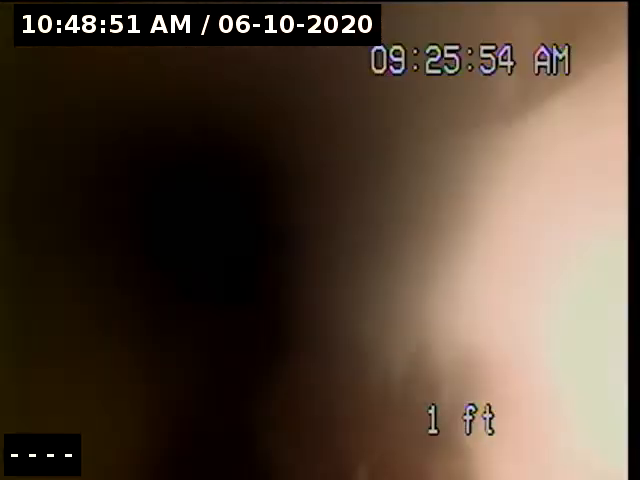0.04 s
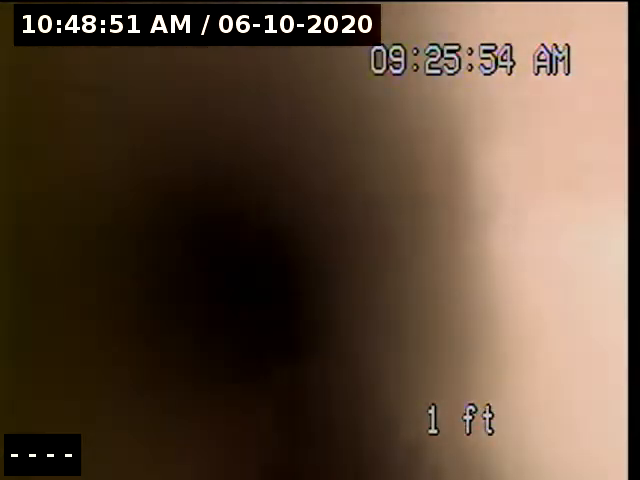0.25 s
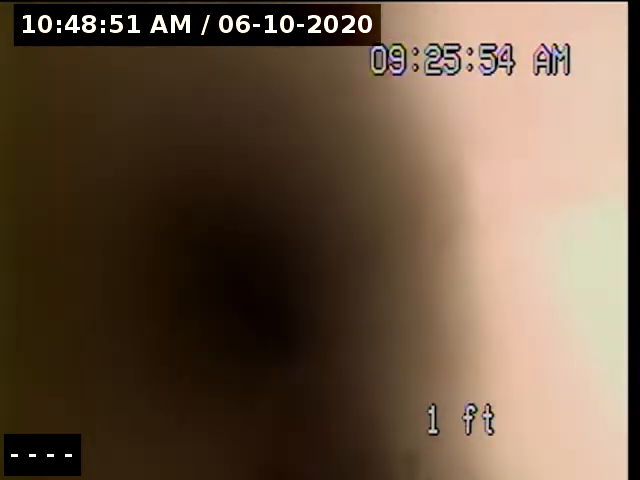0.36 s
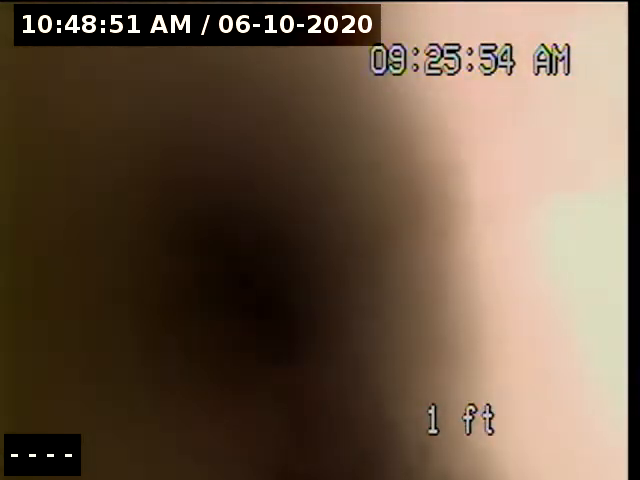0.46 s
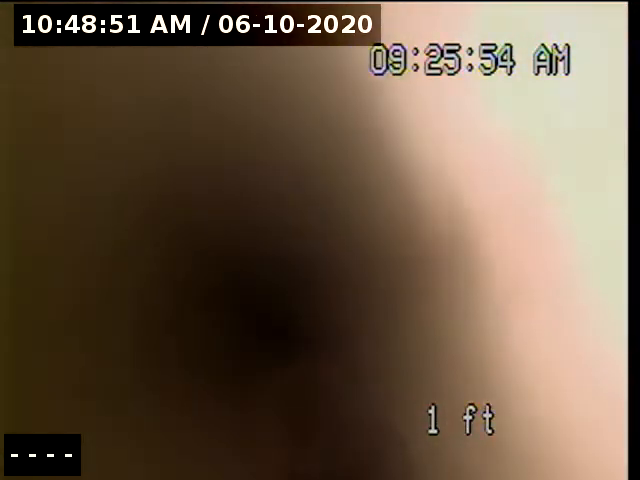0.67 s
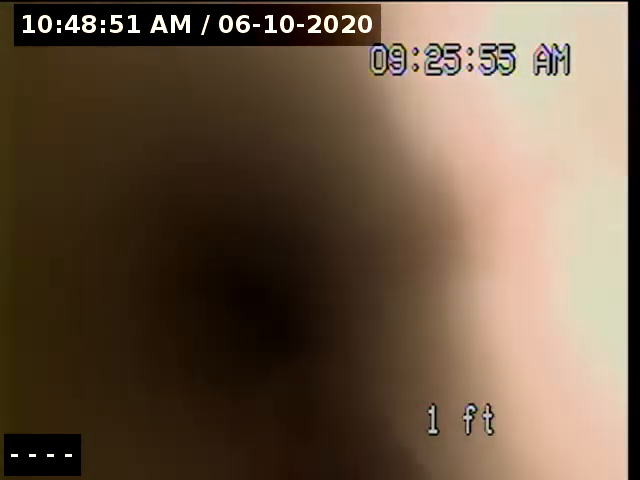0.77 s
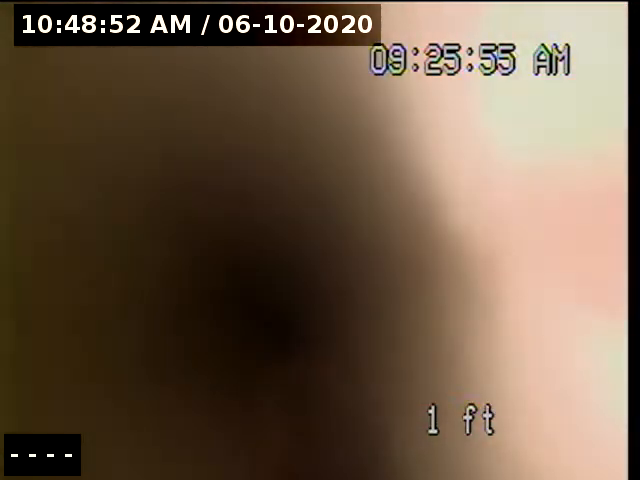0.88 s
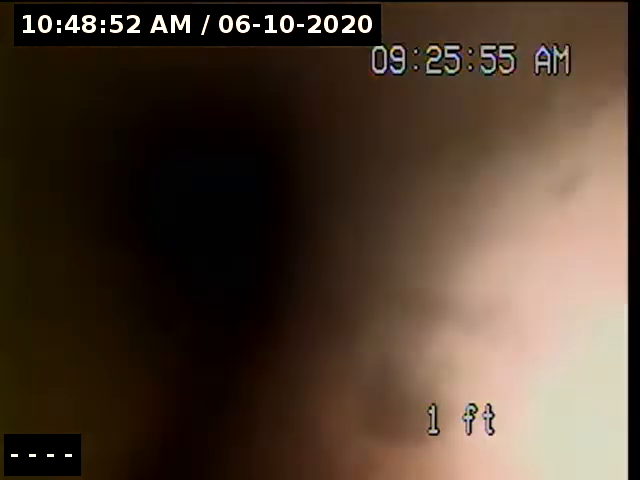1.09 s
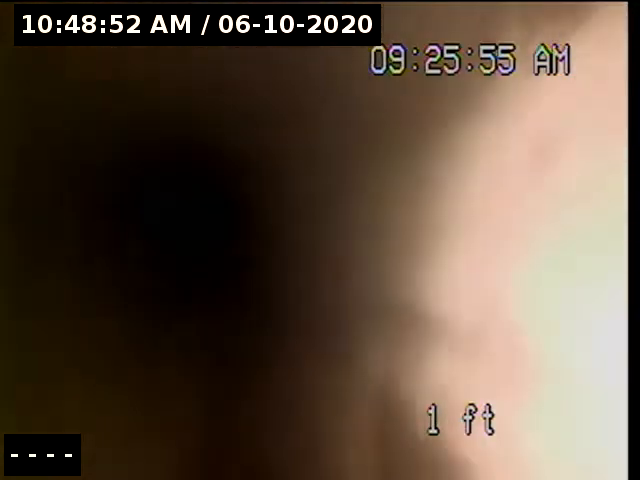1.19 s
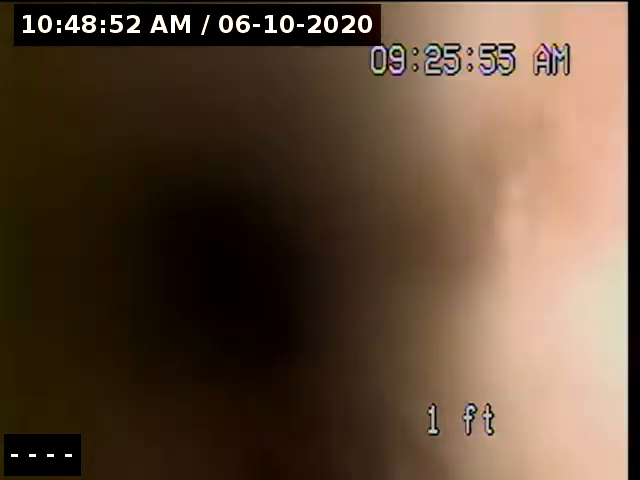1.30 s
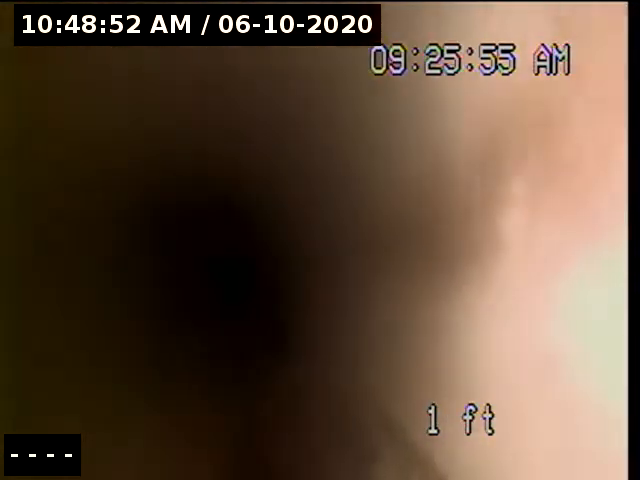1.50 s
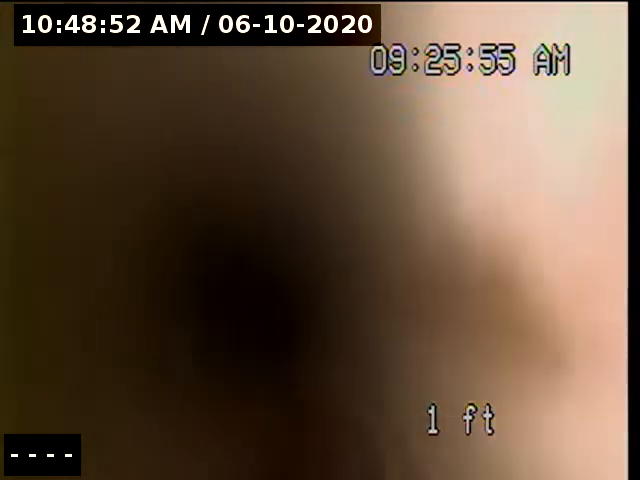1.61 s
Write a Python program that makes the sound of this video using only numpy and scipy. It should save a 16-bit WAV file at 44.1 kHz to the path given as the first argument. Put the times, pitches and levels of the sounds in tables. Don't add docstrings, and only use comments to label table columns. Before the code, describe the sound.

Close handling clatter: gritty rubbing, a heavy clank, a burst of crunching knocks, then a medium bump and small taps fading into steady muffled hiss, all through a distorting low-quality microphone inside the hollow case.

```python
import sys
import numpy as np
from scipy import signal
from scipy.io import wavfile
from scipy.ndimage import uniform_filter1d

SR = 44100
rng = np.random.default_rng(int(sys.argv[2]) if len(sys.argv) > 2 else 0)


def volts(x):
    e = np.asarray(x, float) / 20
    return 10 ** e


def generate_wav(signal):
    frames = np.transpose(np.atleast_2d(signal))
    scaled = np.clip(frames, -1, 1) * 32767
    pcm = np.round(scaled).astype(np.int16)
    wavfile.write(sys.argv[1], SR, pcm)


N = 72765

# [f/Hz, width/Hz, level/dB]
HISS_BANDS = [(129, 94, -13.5), (215, 62, -5), (444.4, 210, -6), (824, 414, 0), (1166, 340, -8),
              (1403, 73, -4.5), (1850, 1400, -11), (2606, 1200, -19), (6100, 3000, -34)]
# [start t/s, end t/s, f/Hz, level/dB]
WHINES = [
    (-.1, .2, 6078, -67),
    (1.03, 1.52, 7149, -63),
    (1.04, 1.14, 7989, -68),
    (1.22, 1.44, 7989, -66),
    (1.2, 1.45, 7520, -70),
    (1.2, 1.7, 6078, -70),
]
# [t/s, level/dB, f/Hz, t60/s]
WALL_NOTES = [
    (.2, 14.5, 646.6, 0.062),
    (.263, -2.5, 658, 0.025),
    (.345, -1.5, 900, 0.016),
    (.394, -9.5, 930, 0.037),
    (.406, -10, 1140, 0.035),
    (0.415, -11.5, 1480, 0.036),
    (0.77, -16, 411.5, 0.14),
    (0.905, 0, 1027, 0.098),
    (0.975, -7, 1236, 0.045),
    (1.213, -8, 608, 0.039),
]
# [t/s, level/dB, f/Hz, hold/s]
BOOMS = [(0.206, 16, 220.8, .012), (0.319, -11, 222, 0.0039), (0.339, -12, 218, .005),
         (.42, 7.5, 217, 0.055), (.478, 3.5, 217.8, 0.0071), (0.821, -18, 225.7, 0.041),
         (0.885, -7.5, 215, 0.015), (.912, 6, 219.7, 0.012), (0.943, -14, 238, 0.012),
         (1.07, -23.5, 243, 0.017), (1.132, -8, 226, 0.0042), (1.214, -4, 228.4, 0.0023),
         (1.285, -18.5, 296, 0.0086), (1.298, -14.5, 215, 0.013), (1.37, -16.5, 236, 0.0067)]
# [t/s, level/dB, rattle t60/s, brightness/dB]
KNOCKS = [(0.199, 15.5, 0.057, -4.5), (0.253, -9.5, 0.014, -14), (0.214, 7, 0.037, -9),
          (0.342, -8, 0.034, -15), (.351, -17, 0.029, -13.5), (.377, -11.5, 0.14, -10),
          (.394, -2.5, 0.01, -16), (0.405, -7.5, 0.038, -24.5), (0.417, 16.5, 0.013, -7),
          (0.43, 7, .015, -0.5), (0.439, 19.5, 0.0081, -7), (0.449, 9.5, 0.013, -3.5), (0.459, 7, .02, -8),
          (0.466, 11.5, 0.025, -16.5), (0.476, 4.5, 0.027, -5.5), (0.509, -15, .03, -12),
          (0.763, -15, 0.04, -5), (.776, -14.5, 0.13, -14), (0.795, -15, 0.02, -3),
          (0.854, -12, 0.052, -2.5), (0.872, -15.5, 0.051, -4), (.887, -14.5, 0.0067, -11.5),
          (0.907, 10.5, 0.027, -12), (0.974, -8, 0.02, -9.5), (1.066, -17, 0.15, -32),
          (1.130, -12.5, 0.015, -9.5), (1.14, -15.5, 0.13, -14), (1.213, -11.5, 0.071, -7),
          (1.29, -21.5, 0.24, -11), (1.392, -29, 0.066, -8)]
# [t/s, level/dB]
DRAG = [(0, -27.5), (.195, -63), (.22, -24.5), (.3, -21), (.4, -25.5), (.48, -20), (.55, -26), (.7, -34),
        (.76, -37), (.82, -35), (.92, -19.5), (1.0, -31), (1.07, -28.5), (1.12, -31.5), (1.16, -29.5),
        (1.2, -38), (1.25, -26), (1.4, -40.5)]
# [f/Hz, width/Hz, level/dB]
CASE_MODES = [(39, 44, -10), (215, 49, -3.5), (370.4, 108, -4.5), (651.4, 149, -2), (900, 463, -3),
              (1140, 308, 0), (1445, 298, -2.5), (1721, 246, -3.5)]
# [f/Hz, width/Hz, level/dB]
SHELL_MODES = [(1683, 140, 9), (2037, 307, 8.5), (2390, 270, 4), (2761, 460, 5.5), (3286, 560, 4.5),
               (4760, 3600, 1), (6390, 1100, -4), (7800, 4500, -2.5)]

HISS_DB, HISS_FLICKER_DB = -24.5, 0.7
BOOM_ATTACK_S, BOOM_T60_S = 0.005, 0.07
KNOCK_DB, KNOCK_HOLD_S, KNOCK_GRIT_DB = -0.5, 0.0044, 4
DRAG_WANDER_DB, DRAG_GRIT_DB, DRAG_BRIGHT_DB = 3.0, 1, -2.5
LEAN, RAIL_UP, RAIL_DOWN = 1, 1.294, 0.33
SAG, SAG_S = 1.35, 0.0017
COUPLING_HZ, NOTCH_HZ, ROLL_HZ, TOP_HZ = 68, 4005, 3240, 7770
CONVERTER_TOP, FULL_SCALE = 0.69, 0.71


def set_level(x, db):
    return x * volts(db) / np.sqrt(np.mean(x ** 2))


def ring(x, modes):
    out = 0
    for k, (hz, width, db) in enumerate(modes):
        b, a = signal.iirpeak(hz, hz / width, fs=SR)
        once = signal.lfilter(b, a, x)
        twice = signal.lfilter(b, a, once)
        out = out + (-1) ** k * volts(db) * twice / np.sqrt(width)
    return out


def grit(spread_db):
    clicks = rng.standard_normal(N)
    return set_level(clicks * volts(spread_db * rng.exponential(size=N)), 0)


def wander(rate_hz):
    hold = int(SR / rate_hz)
    steps = np.repeat(rng.standard_normal(N // hold + 1), hold)
    slow = uniform_filter1d(uniform_filter1d(steps, hold), hold)[:N]
    return slow / slow.std()


def outdoor_hiss():
    total = 0
    for band in HISS_BANDS:
        noise = ring(rng.standard_normal(N), [band])
        total = total + noise * volts(HISS_FLICKER_DB * wander(11.35))
    return set_level(total, HISS_DB)


def high_whines(t):
    on, off, hz, db = np.array(WHINES).T[:, :, None]
    fade = np.clip(np.minimum(t - on, off - t) / 0.03, 0, 1)
    waver_db = 1.6 * np.array([wander(45) for _ in WHINES])
    phase = 2 * np.pi * hz * t + 1.5 * wander(30)
    return (fade * volts(db + waver_db) * np.sin(phase)).sum(0)


def wall_clanks(t):
    on, db, hz, t60 = np.array(WALL_NOTES).T[:, :, None]
    age = np.maximum(t - on, 0)
    return (volts(db - 60 * age / t60) * np.sin(2 * np.pi * hz * age)).sum(0)


def case_booms(t):
    on, db, hz, hold = np.array(BOOMS).T[:, :, None]
    age = t - on
    swell = np.clip(age / BOOM_ATTACK_S, 0, 1)
    decay_db = 60 * np.maximum(age - hold, 0) / BOOM_T60_S
    return (swell * volts(db - decay_db) * np.sin(2 * np.pi * hz * age)).sum(0)


def case_rattle(t):
    on, db, t60, bright = np.array(KNOCKS).T[:, :, None]
    decay_db = 60 * np.maximum(t - on - KNOCK_HOLD_S, 0) / np.maximum(t60, 0.005)
    knocks = (t >= on) * volts(KNOCK_DB + db - decay_db)
    drag = volts(np.interp(t, *np.array(DRAG).T) + DRAG_WANDER_DB * wander(40))
    blow, rub = grit(KNOCK_GRIT_DB), grit(DRAG_GRIT_DB)
    body_push = blow * knocks.sum(0) + rub * drag
    shell_push = blow * (knocks * volts(bright)).sum(0) + rub * drag * volts(DRAG_BRIGHT_DB)
    body = ring(body_push, CASE_MODES) / np.std(ring(rub, CASE_MODES))
    shell = ring(shell_push, SHELL_MODES) / np.std(ring(rub, SHELL_MODES))
    return body + shell


def scene():
    t = np.arange(N) / SR
    return (case_rattle(t) + case_booms(t) + wall_clanks(t) + outdoor_hiss())[None]


def input_overload(x):
    bent = np.where(x > 0, x * (1 + LEAN * x), x / (1 + LEAN * np.abs(x)))
    memory = np.exp(-1 / (SAG_S * SR))
    hits = 1.0 * (bent > RAIL_UP)
    rail = RAIL_UP - SAG * signal.lfilter([1 - memory], [1, -memory], hits)
    return np.clip(bent, -RAIL_DOWN, rail)


def output_filter(x):
    zeros = np.array([1, -2 * np.cos(2 * np.pi * NOTCH_HZ / SR), 1])
    poles = signal.butter(2, ROLL_HZ, fs=SR)[1]
    x = signal.lfilter(zeros * poles.sum() / zeros.sum(), poles, x)
    x = signal.sosfilt(signal.cheby2(8, 45, TOP_HZ + 1500, fs=SR, output="sos"), x)
    return signal.sosfilt(signal.butter(4, TOP_HZ, fs=SR, output="sos"), x)


def low_pass(x):
    return signal.sosfilt(signal.butter(12, 8800, fs=SR, output="sos"), x)


def record(dry):
    x = input_overload(dry)
    x = signal.sosfilt(signal.butter(1, COUPLING_HZ, "high", fs=SR, output="sos"), x)
    x = np.minimum(x, CONVERTER_TOP)
    x = output_filter(x) + high_whines(np.arange(N) / SR)
    mix = np.clip(x, -FULL_SCALE, FULL_SCALE)
    return low_pass(mix)


dry = scene()
out = record(dry)
generate_wav(out)
```